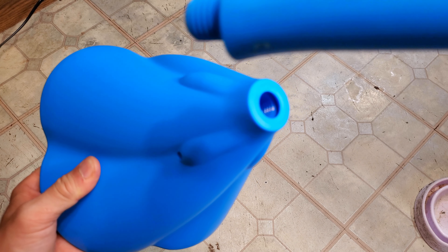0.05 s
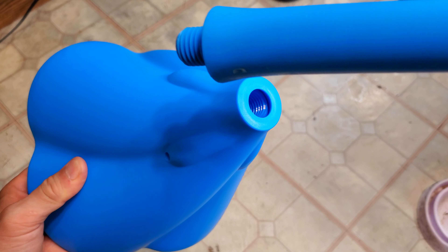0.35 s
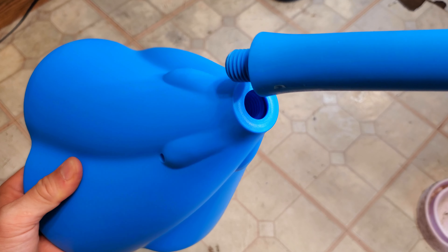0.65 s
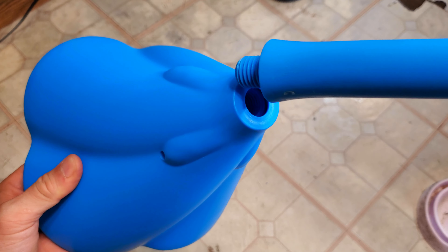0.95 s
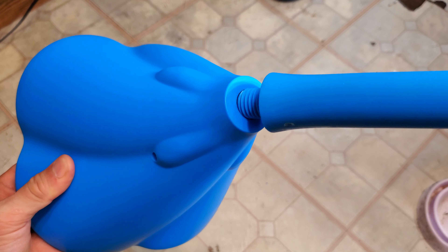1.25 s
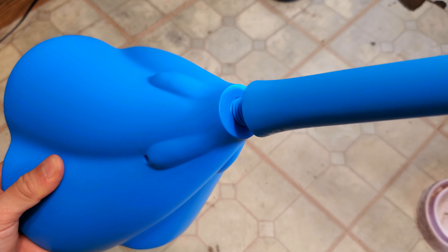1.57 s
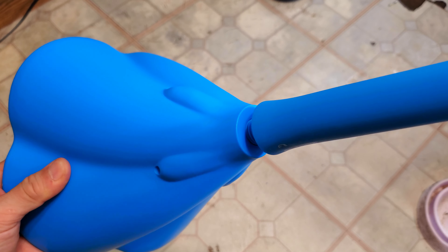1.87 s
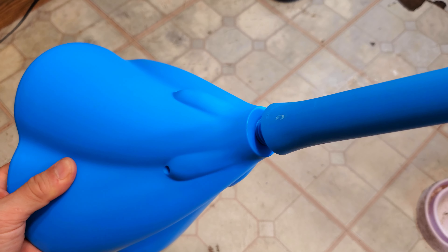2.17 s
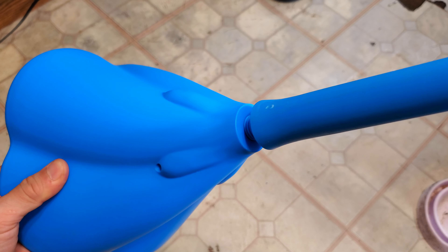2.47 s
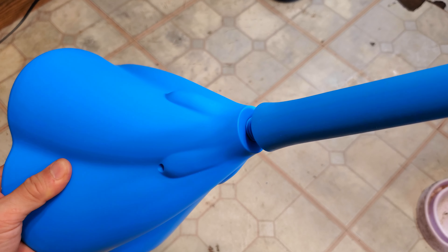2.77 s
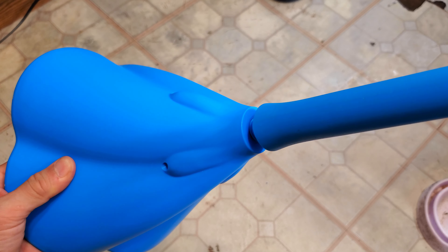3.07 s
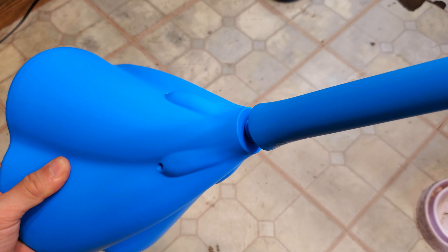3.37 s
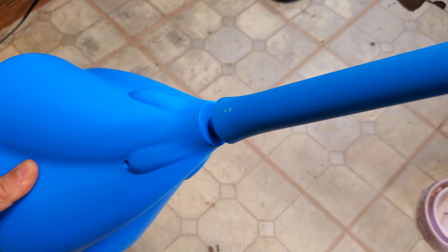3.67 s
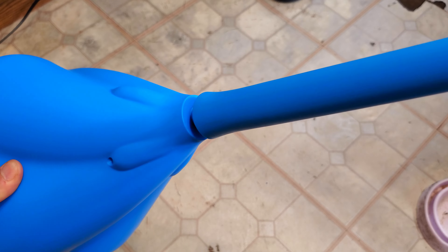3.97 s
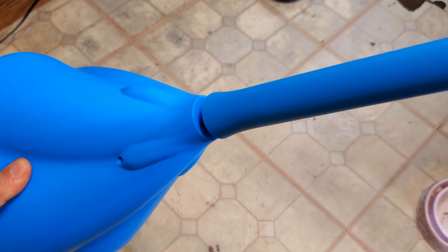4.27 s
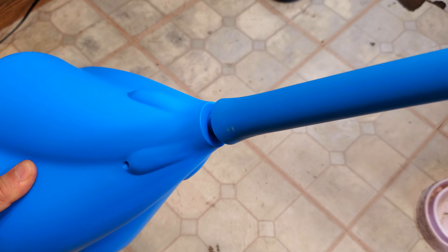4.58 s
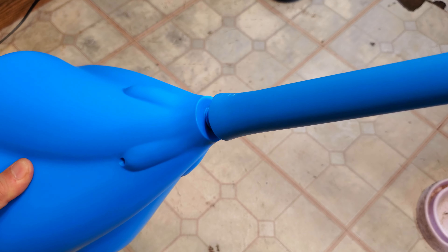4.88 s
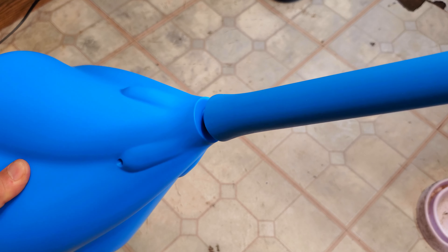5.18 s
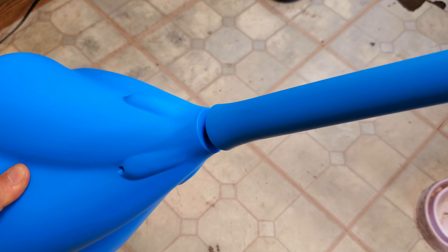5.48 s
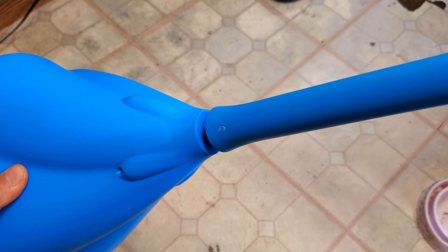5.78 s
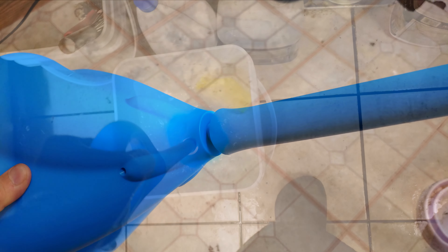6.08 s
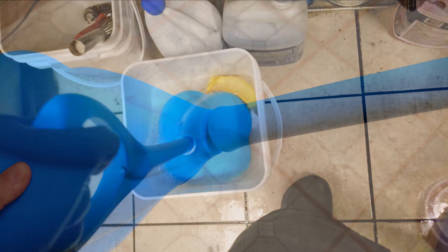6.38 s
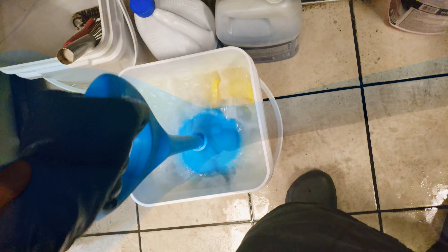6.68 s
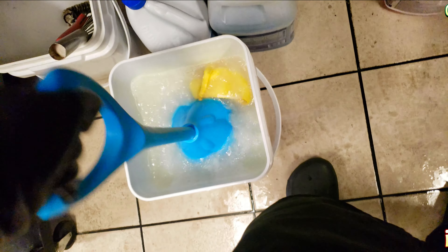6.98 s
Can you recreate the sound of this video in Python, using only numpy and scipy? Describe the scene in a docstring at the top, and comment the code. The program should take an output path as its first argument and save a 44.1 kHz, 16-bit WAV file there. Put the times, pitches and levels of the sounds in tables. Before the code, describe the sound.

A plastic handle is screwed into a hollow plunger head with taps, rubs and knocks, then soapy water sloshes loudly in a bucket.

```python
"""A small tiled room with a faint hum and a wavering whine. A plastic handle taps the socket of a
hollow plunger head, ringing its modes, and is screwed in: the palm slides and squeaks, the thread
ticks, rubs at each twist and jumps with loud knocks. Then the plunger churns soapy water in a plastic
bucket: trapped air throbs and gulps, bubbles ring, spray slaps and suds fizz."""
import sys
import numpy as np
from scipy import signal
from scipy.fft import rfft, irfft, next_fast_len
from scipy.io import wavfile
from scipy.ndimage import uniform_filter1d

SR = 44100
rng = np.random.default_rng(int(sys.argv[2]) if len(sys.argv) > 2 else 0)


def master(y):
    """Save y as 16-bit WAV."""
    cut = np.clip(np.atleast_2d(y).T, -1, 1)
    pcm = np.round(cut * 32767)  # scale
    wavfile.write(sys.argv[1], SR, pcm.astype(np.int16))


N = 310464
WATER_START_S = 5.78
TIME_S = np.arange(N) / SR
WATER_TIME_S = TIME_S[int(WATER_START_S * SR):]
WATER_N = len(WATER_TIME_S)
SIDES = np.array([[1], [-1]])

# Diffuse field. Each row: frequency in Hz, left-right correlation.
STEREO_CORRELATION = [(60, .93), (250, .88), (600, .6), (1200, .2), (2200, 0), (4400, -.2), (8000, 0),
                      (16000, 0)]
# Noise spectra. Each row: frequency in Hz, relative level in dB.
ROOM_TONE_SPECTRUM = [(15, -42), (25, -38.5), (53, -9.5), (130, -13.5), (249, -9.5), (384, -18), (489, -17),
                      (796, -38.5), (1160, -12), (1480, -29.5), (1840, -35), (2410, -33.5), (2690, -34),
                      (3920, -41), (9000, -49.5), (16000, -49.5)]
PALM_SPECTRUM = [(900, -27), (2000, 2.5), (2700, 10.5), (3300, -17), (5000, -9.5), (6400, 2), (8000, -5.5),
                 (9800, -6), (11500, -12.5), (16000, -9)]
SHELL_SPECTRUM = [(30, -29.5), (80, -3.5), (150, -0.5), (250, 6.5), (500, -5), (750, -10), (1000, -18.5),
                  (1500, -7), (2100, -9.5), (3000, -5.5), (5000, -5.5), (8000, -16.5), (11000, -21),
                  (16000, -31.5)]   # dense upper modes and room ring of a blow
RUB_SPECTRUM = [(60, -4), (230, 4.5), (450, 2.5), (750, 0.5), (1000, -5), (1900, -5.5), (3000, -16),
                (8000, -24)]
HISS_SPECTRUM = [(800, -39), (2300, 6.5), (3300, -5.5), (4200, 5.5), (6500, -1.5), (8300, -1), (9800, 6.5),
                 (12000, -24), (14500, -5.5), (16000, -3.5)]
GURGLE_SPECTRUM = [(200, -3), (330, -6), (410, -9), (458, -17), (510, -1), (590, -8), (660, -8), (900, -11),
                   (1500, -7)]
SPLASH_SPECTRUM = [(450, -12), (720, -5), (1150, -5), (1600, -0.5), (2050, -1.5), (2300, 0), (2800, 5.5),
                   (3500, -4.5), (4400, 4.5), (5500, -3), (7200, -2.5), (9000, -32), (12000, -10)]
FOAM_SPECTRUM = [(3000, 0), (8000, -6), (10000, -7.5), (12500, 2), (15500, 5.5), (17000, -44)]
# Resonances. Each row: centre in Hz, width in Hz, relative level in dB.
HUM_BANDS = [(62.7, 3.7, -74.5), (242.2, 9.7, -69), (1037, 237, -72), (1853, 35, -81.5)]
BUCKET_AIR_MODES = [(61.2, 5.5, -4), (74.8, 7.4, -1), (96.8, 11.2, -1.5), (121, 4.4, -25), (202, 10.2, -4),
                    (243.8, 13, 4.5), (267.5, 18.3, -1.5)]
CUP_AIR_MODES = [(392, 41, -4.5), (456.3, 37, -0.5), (538.6, 32, -5), (596, 16, -6)]

# Hand on the soft head. Each row: start in seconds, pitch in Hz, level in dB.
HAND_BUMPS = [(0.046, 71, -47.5), (0.049, 120, -53), (0.657, 65.4, -51), (5.541, 56, -51.5)]
# Squeaks. Each row: centre and half length in seconds, start and end pitch in Hz, relative level in dB.
SQUEAK_GLIDES = [(0.503, 0.019, 7040, 6200, -81), (.875, .028, 6050, 5730, -81),
                 (1.047, .05, 2700, 2610, -76.5), (1.042, .023, 6400, 6500, -81),
                 (1.23, .033, 5960, 6320, -83), (1.377, .035, 6500, 6260, -81.5),
                 (1.624, 0.036, 6600, 6240, -88.5), (1.702, 0.057, 5500, 4300, -85),
                 (2.334, 0.12, 2230, 1825, -85), (2.597, 0.044, 9300, 9700, -84),
                 (5.473, .031, 4200, 3560, -86), (5.712, .032, 6630, 5800, -80),
                 (6.173, 0.015, 2325, 3110, -41.5)]
# Fingers shifting before the thread bites. Each row: centre in seconds, relative level in dB.
FINGER_SHIFTS, SHIFT_HALF_S = [(.51, -73), (1.055, -75), (1.24, -68)], 0.027
# Taps on the socket and ticks of the scraping thread. Each row: start in seconds, then thud, body,
# clack and crack force in dB.
TAPS_AND_THREAD_TICKS = [(.7922, -49, -35, -50, -68.5), (.853, -47, -37.5, -57, -72.5),
                         (.967, -63, -44, -47.5, -75), (1.215, -49.5, -51.5, -61, -83),
                         (1.267, -57, -53.5, -55, -89), (1.331, -55, -52.5, -69, -86),
                         (1.817, -44.5, -46, -49, -73.5), (1.932, -53, -64, -60, -70),
                         (2.0, -77, -58, -60, -73), (2.651, -47.5, -48, -53, -75)]
# Thread jumping in the socket. Same columns.
THREAD_KNOCKS = [(1.768, -30.5, -37, -46.5, -68), (3.2012, -27, -12, -21, -39.5),
                 (3.836, -34.5, -31, -43, -62), (4.083, -58, -49, -47, -63),
                 (4.136, -35, -14.5, -21.5, -40)]
# Force bands in Hz: thud, body (two edges), clack, crack.
FORCE_BANDS_HZ = [280, 500, 800, 1400, 4500]
# Head modes, socket open or handle seated. Each row: frequency in Hz, gain in dB, T60 in seconds.
OPEN_HEAD_MODES = [(370, 15.5, 0.019), (362, -0.5, 0.089), (471.5, -10, 0.25), (628, 5.5, 0.046),
                   (639, -11, 0.17), (706, -3.5, 0.14), (943, -3, 0.066), (2515, 3.5, 0.055)]
SEATED_HEAD_MODES = [(158.4, 5.5, 0.053), (287.6, 14, 0.039), (374, -2, 0.021), (501, -6.5, .21),
                     (583.5, -3, 0.16), (547, 7.5, 0.026), (740, -11, 0.048), (892, -23, 0.16),
                     (975, -21, 0.093), (1011, -10, 0.096), (1036, -17.5, 0.033), (1425, 8, 0.027),
                     (1486, -11, .13), (1523, -4, 0.071), (2515, 0, 0.084), (3190, -4.5, 0.042)]
# Twists. Each row: centre in seconds, then relative rub, hiss and palm levels in dB.
HANDLE_TWISTS = [(1.99, -64.5, -76.5, -83), (2.348, -88, -86, -95), (2.63, -64.5, -90, -79.5),
                 (2.97, -62, -71.5, -75.5), (3.24, -67, -82, -75), (3.578, -60, -72, -75),
                 (3.855, -56.5, -81, -77.5), (4.13, -57.5, -70.5, -89), (4.386, -63.5, -73, -66),
                 (4.658, -62, -73.5, -92), (4.911, -58.5, -71, -74), (5.17, -59.5, -69.5, -79.5),
                 (5.428, -65.5, -69.5, -79), (5.695, -58.5, -71.5, -89)]
# Pace of the hand. Each row: time, half length of a twist, half length of a slide, all in seconds.
HAND_PACE = [(2.0, 0.091, 0.079), (3.4, 0.031, 0.14), (4.9, 0.037, 0.055)]

# Heaving of the water. Each row: time in seconds, relative level in dB.
HEAVE_CURVE = [(5.78, -64), (5.9, -56.5), (6.03, -47), (6.15, -40), (6.3, -38.5), (6.42, -35),
               (6.65, -34.5), (6.72, -31), (6.94, -35.5), (7.0, -30)]
# Water forced through the cup. Each row: peak time, rise and fall in seconds, then relative gurgle,
# splash and foam levels in dB.
PLUNGER_THRUSTS = [(5.91, .026, 0.059, -46, -46, -36.5), (6.17, 0.034, 0.054, -44.5, -51, -38),
                   (6.69, 0.058, 0.15, -43, -36, -37.5), (6.797, .027, 0.028, -28.5, -30, -22.5),
                   (6.86, 0.021, .022, -31.5, -29.5, -28), (7.03, 0.034, .04, -60, -61, -40.5)]
# Single large bubbles. Each row: start in seconds, initial pitch in Hz, level in dB.
LARGE_BUBBLES = [(6.128, 470, -31.5), (6.405, 733, -34), (6.407, 1080, -32), (6.466, 590, -28.5),
                 (6.682, 540, -28.5), (6.776, 497, -23), (6.8, 435, -16), (6.826, 456, -21.5),
                 (6.954, 1100, -33), (7.021, 700, -37)]
# Slaps of spray. Each row: start in seconds, level in dB, centre in Hz.
SPRAY_SLAPS = [(5.84, -52, 12200), (6.083, -36.5, 1570), (6.366, -36, 2420), (6.404, -34, 3520),
               (6.413, -27, 15800), (6.418, -44, 15600), (6.465, -35, 2050), (6.541, -38, 1690),
               (6.585, -31, 1700), (6.686, -29.5, 1840), (6.772, -17.5, 2600), (6.799, -21, 5000),
               (6.846, -20.5, 3170), (6.904, -27, 2580), (6.952, -32.5, 3960)]
# Balance of the water. Each row: frequency in Hz, left minus right in dB.
WATER_BALANCE = [(100, 0.5), (700, 2), (1300, -0.5), (2400, -4.5), (4400, 0.5), (8100, 6.5), (15000, -0.5)]


def from_db(db):
    """Decibels to gain."""
    return np.exp(np.asarray(db) * (np.log(10) / 20))


def unit_rms(x):
    """Scale to unit rms."""
    return x / np.sqrt(np.mean(x ** 2) + 1e-20)


def at_hz(points, hz):
    """Interpolate on a log-frequency axis."""
    known_hz, values = np.transpose(points)
    return np.interp(np.log(np.maximum(hz, 1)), np.log(known_hz), values)


def add(out, start_s, sound):
    """Mix a short sound in."""
    place = out[:, max(int(start_s * SR), 0):][:, :sound.shape[-1]]
    place += sound[..., :place.shape[1]]


def drift(rate_hz):
    """Random wander, unit rms."""
    knots_s = np.arange(0, N / SR + 1, 1 / rate_hz)
    return unit_rms(np.interp(TIME_S, knots_s, rng.standard_normal(4096)[:len(knots_s)]))


def diffuse(pair, spectrum=((1, 0),)):
    """Two unrelated signals to a diffuse stereo field; flat by default."""
    size = next_fast_len(pair.shape[-1])
    hz = np.fft.rfftfreq(size, 1 / SR)
    mid, side = rfft(pair, size)
    correlation = at_hz(STEREO_CORRELATION, hz)
    field = np.sqrt(1 + correlation) * mid + np.sqrt(1 - correlation) * side * SIDES
    return irfft(field * from_db(at_hz(spectrum, hz)), size)[:, :pair.shape[-1]]


def noise(size=N):
    """Two streams of white noise."""
    return rng.standard_normal((2, size))


def grit(grain_db, size=N):
    """Noise with uneven sample sizes: tiny slips or bursts."""
    return noise(size) * from_db(grain_db * np.minimum(rng.exponential(1, (2, size)), 6))


def resonant_noise(modes, size=N):
    """Noise through resonances, each at its own rms level."""
    drive, out = diffuse(noise(size)), 0
    for hz, width_hz, db in modes:
        radius = np.exp(-2 * np.pi * width_hz / SR)
        section = [1, 0, -1, 1, -2 * radius * np.cos(2 * np.pi * hz / SR), radius ** 2]
        out = out + from_db(db) * unit_rms(signal.sosfilt([section, section], drive))
    return out


def ping(hz, cycles, rise):
    """Sine decaying by 60 dB; pitch rises by a fraction, as in a bubble nearing the surface."""
    life = np.linspace(0, 1, int(cycles / hz * SR) + 2)
    return np.sin(2 * np.pi * cycles * life * (1 + rise * life / 2)) * from_db(-60 * life)


def swells(rows):
    """Envelope of peaks that taper both ways."""
    grid_s = np.linspace(0, N / SR, 3000)
    peaks = [from_db(db + 1) / np.cosh(np.clip(1.235 * (grid_s - centre_s) / half_s, -40, 40))
             for centre_s, half_s, db in rows]
    return np.interp(TIME_S, grid_s, sum(peaks))


def room(x, wet_db, t60_s=0.35):
    """Direct sound plus the diffuse ring of tiled walls."""
    t = TIME_S[:SR // 2]
    tail = diffuse(noise(len(t))) * from_db(-60 * t / t60_s) * (t > .003)
    tail /= np.sqrt(np.sum(tail ** 2) / 2)
    return x + from_db(wet_db) * signal.fftconvolve(x, tail, axes=1)[:, :x.shape[1]]


def background():
    """Room tone, low hum and a thin unsteady whine."""
    whine_hz = 1185 + 21.06 * drift(12) + 11 * drift(90)
    phase = 2 * np.pi * np.cumsum(whine_hz) / SR
    flutter_db = 2.8 * drift(40) + 1.5 * drift(9)
    whine = from_db(-66 + SIDES * 3 + flutter_db) * np.sin(phase + SIDES * 0.24)
    room_tone = from_db(-64.5) * unit_rms(diffuse(noise(), ROOM_TONE_SPECTRUM))
    return room_tone + resonant_noise(HUM_BANDS) + whine


def head_flex(grip_db=-64, hold_s=1.9, settle_db_per_s=10.5, rest_db=-75.5):
    """The gripped head flexes and rumbles until the thread holds, then settles."""
    level_db = np.maximum(grip_db - settle_db_per_s * np.maximum(TIME_S - hold_s, 0), rest_db)
    spectrum = [(15, -30.5), (45, 6.5), (75, 5.5), (150, -5.5), (400, -32), (2000, -67)]
    return from_db(level_db) * unit_rms(diffuse(noise(), spectrum))


def hand_bumps():
    """The hand thumps the soft head."""
    out = np.zeros((2, N))
    for start_s, hz, db in HAND_BUMPS:
        add(out, start_s, from_db(db) * ping(hz, cycles=12, rise=0))
    return out


def squeaks(width_hz=110, gain_db=4):
    """Plastic under the palm, later air past the plunger's lip: gliding, stuttering noise bands."""
    out = np.zeros((2, N))
    for centre_s, half_s, start_hz, end_hz, db in SQUEAK_GLIDES:
        size = int(6 * half_s * SR)
        along = np.linspace(-3, 3, size)
        phase = 2 * np.pi * np.cumsum(np.interp(along, [-2, 2], [start_hz, end_hz])) / SR
        white = rng.standard_normal((2, 2, SR))[..., :size]
        spread_hz = width_hz + 0.21 * abs(end_hz - start_hz)   # a wide glide is less pure
        in_phase, quadrature = signal.sosfilt(signal.butter(2, spread_hz, fs=SR, output="sos"), white)
        band = unit_rms(in_phase * np.cos(phase) + quadrature * np.sin(phase))
        envelope = from_db(db + gain_db + 2 * drift(120)[:size]) * np.exp(-along ** 2 / 2)
        add(out, centre_s - size / SR / 2, band * envelope)
    return out


def palm_slides(lead_s=0.115):
    """Skin rubs plastic: fingers shift, then the palm regrips before each twist."""
    pace_s, _, slide_half_s = np.transpose(HAND_PACE)
    twist_s, _, _, palm_db = np.transpose(HANDLE_TWISTS)
    slides = list(zip(twist_s - lead_s, np.interp(twist_s, pace_s, slide_half_s), palm_db))
    shifts = [(centre_s, SHIFT_HALF_S, db) for centre_s, db in FINGER_SHIFTS]
    return swells(shifts + slides) * unit_rms(diffuse(grit(grain_db=3.5), PALM_SPECTRUM))


def contacts(rows, modes, tail_db, tail_t60_s, snap_db, snap_s, contact_s, left_lead_s, pan_db=3.5):
    """Each tap, tick or knock rings the head's modes, with a bright snap and a diffuse tail."""
    out, t = np.zeros((2, N)), TIME_S[:SR // 2]
    side_time_s = t + SIDES * left_lead_s / 2
    bright = signal.butter(2, 1300, "high", fs=SR, output="sos")
    attack = 1 - np.exp(-(t / contact_s) ** 2)
    for start_s, thud_db, body_db, clack_db, crack_db in rows:
        force = list(zip(FORCE_BANDS_HZ, [thud_db, body_db, body_db, clack_db, crack_db]))
        ring = sum(from_db(db + at_hz(force, hz) - 60 * t / t60_s) * np.sin(2 * np.pi * hz * side_time_s)
                   for hz, db, t60_s in modes)
        shell = diffuse(noise(len(t)), [(hz, db + at_hz(force, hz)) for hz, db in SHELL_SPECTRUM])
        tail = shell * from_db(tail_db - 60 * t / tail_t60_s)
        snap = signal.sosfilt(bright, shell) * from_db(snap_db) * np.exp(-t / snap_s)
        add(out, start_s, (ring + tail + snap) * attack * from_db(SIDES * pan_db / 2))
    return signal.sosfilt(signal.butter(2, 55, "high", fs=SR, output="sos"), out + 1e-18)


def thread_rub():
    """The thread rubs and hisses unevenly at each twist."""
    pace_s, twist_half_s, _ = np.transpose(HAND_PACE)
    twist_s, rub_db, hiss_db, _ = np.transpose(HANDLE_TWISTS)
    half_s = np.interp(twist_s, pace_s, twist_half_s)
    rub = swells(zip(twist_s, half_s, rub_db)) * unit_rms(diffuse(grit(grain_db=3.5), RUB_SPECTRUM))
    hiss = swells(zip(twist_s, half_s, hiss_db)) * unit_rms(diffuse(grit(grain_db=0.5), HISS_SPECTRUM))
    return (rub + hiss) * from_db(2.02 * drift(110))


def bubble_cloud(low_hz, high_hz, cycles, spread_db, count):
    """Bubbles of random onset, pitch, strength and side, evened to unit level."""
    out = np.zeros((2, WATER_N))
    for when, pitch, rank, side in rng.random((count, 4)):
        ring = ping(low_hz * (high_hz / low_hz) ** pitch, cycles, rise=0.35)
        gain = from_db(-spread_db * np.log(rank + 0.0085))
        pan = np.array([[np.cos(2 * np.pi * side)], [np.sin(2 * np.pi * side)]])
        add(out, when * WATER_N / SR, ring * gain * pan)
    power = np.abs(uniform_filter1d(np.mean(out ** 2, axis=0), size=2500))
    return out / np.sqrt(power + 1e-6)


def gurgle(level_db):
    """Low bubbles glug; air trapped in the cup resonates."""
    bubbles = bubble_cloud(260, 1040, cycles=9.3, spread_db=0, count=400)
    glugs = unit_rms(diffuse(room(bubbles, wet_db=-5), GURGLE_SPECTRUM))
    return from_db(level_db) * (from_db(-4) * glugs + resonant_noise(CUP_AIR_MODES, WATER_N))


def splash(level_db):
    """Small bubbles and tiny bursts, flickering in level."""
    drops = bubble_cloud(793.5, 10420, cycles=47, spread_db=4.5, count=2200)
    drops += from_db(-2) * unit_rms(grit(grain_db=2.5, size=WATER_N))
    envelope = from_db(level_db + 2.2 * drift(60)[-WATER_N:])
    return envelope * unit_rms(diffuse(room(drops, wet_db=2.5), SPLASH_SPECTRUM))


def foam(relative_db):
    """Suds fizz in tiny bursts."""
    envelope = from_db(relative_db - 3.5 + 1.7 * drift(90)[-WATER_N:])
    return envelope * unit_rms(diffuse(grit(grain_db=1.5, size=WATER_N), FOAM_SPECTRUM))


def slaps_and_plops(slap_decay_s=0.0035):
    """Spray slaps sharply; single large bubbles ring."""
    out, t = np.zeros((2, WATER_N)), TIME_S[:SR // 20]
    for start_s, db, hz in SPRAY_SLAPS:
        spectrum = [(hz / 6, -22), (hz, 0), (hz * 3, -17), (hz * 7, -38)]
        spray = unit_rms(diffuse(noise(len(t)), spectrum))
        add(out, start_s - WATER_START_S, from_db(db) * spray * np.exp(-t / slap_decay_s))
    for start_s, hz, db in LARGE_BUBBLES:
        add(out, start_s - WATER_START_S, from_db(db) * ping(hz, cycles=29.7, rise=0.23))
    return room(out, wet_db=-4)


def water_levels_db(heave_db, reference_db=-35.5):
    """Gurgle, splash and foam follow the heaving and swell at each thrust."""
    laws = [(-47.5, 0.81), (-46.5, 0.81), (-53.5, 0.78)]   # dB at the reference, dB per dB of heave
    power = np.array([from_db(db + slope * (heave_db - reference_db)) ** 2 for db, slope in laws])
    for peak_s, rise_s, fall_s, *levels_db in PLUNGER_THRUSTS:
        distance = np.abs(WATER_TIME_S - peak_s) / np.where(WATER_TIME_S < peak_s, rise_s, fall_s)
        power += (from_db(levels_db)[:, None] * np.exp(-.5 * distance ** 1.66)) ** 2
    return 10 * np.log10(power)


def water(fade_in_s=0.037):
    """Air throbs in the bucket under the churning water; all panned by frequency."""
    heave_db = np.interp(WATER_TIME_S, *np.transpose(HEAVE_CURVE))
    gurgle_db, splash_db, foam_db = water_levels_db(heave_db)
    throb = from_db(heave_db - 6) * resonant_noise(BUCKET_AIR_MODES, WATER_N)
    wash = throb + gurgle(gurgle_db) + splash(splash_db) + foam(foam_db) + slaps_and_plops()
    wash *= np.clip((WATER_TIME_S - WATER_START_S) / fade_in_s, 0, 1)
    size = next_fast_len(2 * WATER_N)
    pan = from_db(SIDES * at_hz(WATER_BALANCE, np.fft.rfftfreq(size, 1 / SR)) / 2)
    panned = irfft(rfft(wash, size) * pan, size)[:, :WATER_N]
    return np.pad(panned, [(0, 0), (N - WATER_N, 0)])


def scene():
    """Plastic, water and room, summed."""
    taps_and_ticks = contacts(TAPS_AND_THREAD_TICKS, OPEN_HEAD_MODES, tail_db=8.5, tail_t60_s=0.36,
                              snap_db=6, snap_s=0.0031, contact_s=0.001, left_lead_s=-0.000099)
    knocks = contacts(THREAD_KNOCKS, SEATED_HEAD_MODES, tail_db=10, tail_t60_s=0.2,
                      snap_db=22.5, snap_s=0.0016, contact_s=0.0018, left_lead_s=0.00015)
    friction = (thread_rub() + palm_slides()) * from_db(SIDES * 1.2)
    handling = taps_and_ticks + knocks + friction + hand_bumps()
    return handling + squeaks() + head_flex() + water() + background()


def record(dry, cutoff_hz=16000):
    """Steep low-pass."""
    return signal.sosfilt(signal.ellip(10, .1, 70, cutoff_hz, fs=SR, output="sos"), dry)


dry = scene()
out = record(dry)
master(out)
```